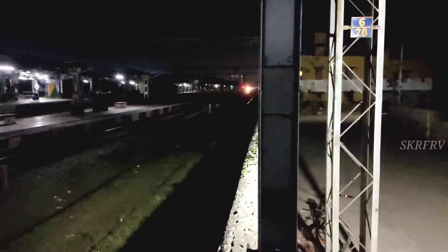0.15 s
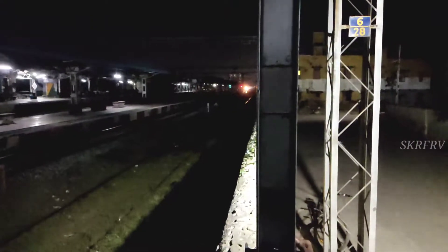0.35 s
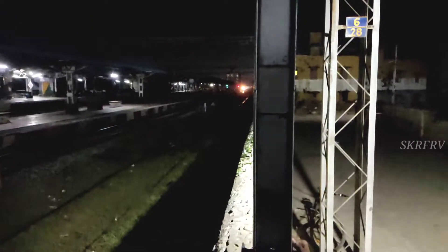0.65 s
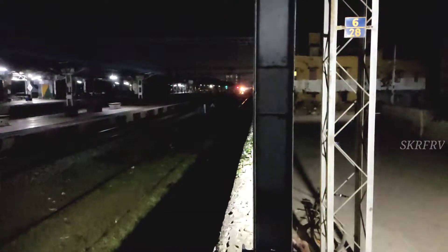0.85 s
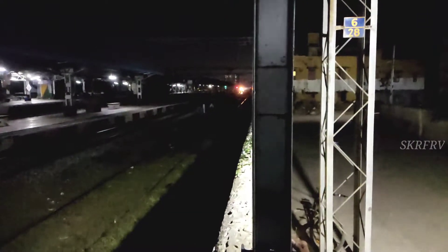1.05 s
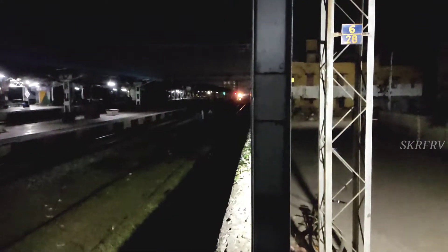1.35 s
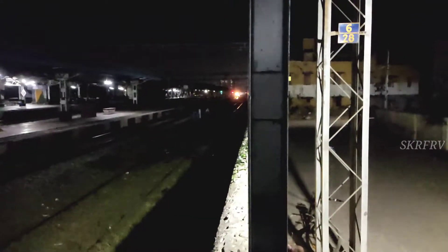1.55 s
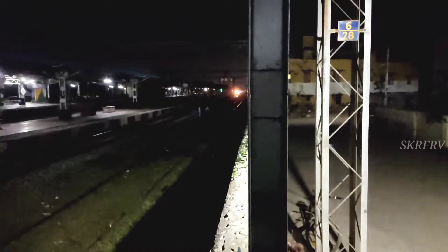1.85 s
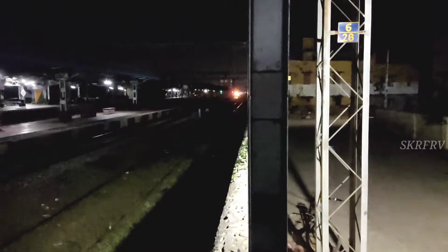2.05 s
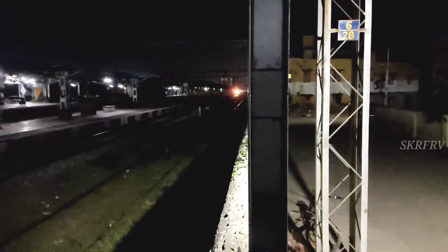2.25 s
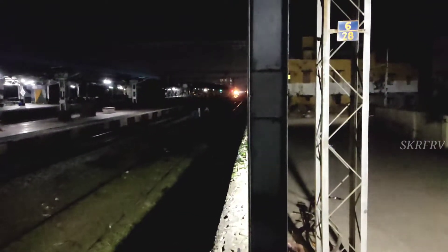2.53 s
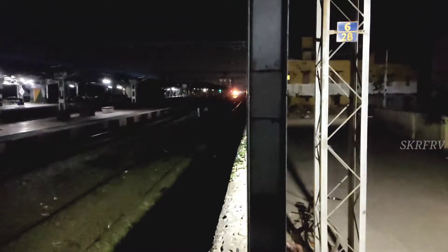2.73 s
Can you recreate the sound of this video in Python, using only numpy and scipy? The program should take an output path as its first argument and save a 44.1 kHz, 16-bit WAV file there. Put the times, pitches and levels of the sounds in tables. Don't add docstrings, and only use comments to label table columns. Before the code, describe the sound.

Loud wavering blower whine comes first and dominates, with rumbling wheels, faint singing gears and hissing air beneath; the train recedes and softens near the end, captured outdoors beside the tracks by a modest handheld recorder.

```python
import sys
import numpy as np
from scipy import signal
from scipy.fft import rfft, irfft, next_fast_len
from scipy.io import wavfile
from scipy.ndimage import uniform_filter1d, map_coordinates

SR = 44100
rng = np.random.default_rng(int(sys.argv[2]) if len(sys.argv) > 2 else 0)


def store_wav(level_fs):
    pcm = np.round(np.clip(np.atleast_2d(level_fs), -1, 1) * 32767)
    wavfile.write(sys.argv[1], SR, pcm.T.astype(np.int16))


def invert_db(level):
    return 10 ** (np.asarray(level, dtype=float) / 20)


N = 127449


def along(points, hz):
    point_hz, value = np.transpose(points)
    return np.interp(np.log(hz + 1), np.log(point_hz + 1), value)


def curve(rows):
    return np.interp(np.arange(N) / SR, *np.transpose(rows))


def unit(x):
    return x / np.sqrt(np.mean(np.abs(x) ** 2) + 1e-20)


def wobble(rate):
    return map_coordinates(rng.standard_normal(400), [np.arange(N) * rate / SR])


def swell(peak_s, length_s):
    return np.exp(-.5 * ((np.arange(N) / SR - peak_s) / length_s) ** 2)


def filtered(x, response):
    size = next_fast_len(N + 8192)
    spectrum = rfft(x, size) * response(np.fft.rfftfreq(size, 1 / SR))
    return irfft(spectrum, size)[..., :N]


def hump(hz, width_hz):
    return lambda f: 1 / (1 + ((f - hz) / width_hz) ** 2)


def shaped(points_db):
    return lambda f: invert_db(along(points_db, f))


def rush(response, patchy_db, alike=None):
    # hz, port_likeness (0-1)
    usual_alike = [(60, 1), (350, 0.91), (500, 0.26), (800, 0.55), (1900, 0.31), (4000, 0.19), (6500, 0.59),
                   (8500, 0.083)]
    likeness = usual_alike if alike is None else alike
    z = signal.stft(rng.standard_normal((2, N + 512)), nperseg=512)[2]
    patches = uniform_filter1d(rng.standard_normal(z.shape[1:]), size=5, axis=0)
    patches = uniform_filter1d(patches, size=14, axis=1)
    pair = signal.istft(z * invert_db(patchy_db * unit(patches)), nperseg=512)[1][:, :N]

    def shared_and_own(f):
        angle = np.arccos(np.clip(along(likeness, f), -1, 1)) / 2
        return response(f) * np.array([np.cos(angle), np.sin(angle)])

    same, other = filtered(pair, shared_and_own)
    return unit(np.array([same + other, same - other]))


def tone(hz, blur_hz, steady):
    path_rad = 0.23 + 0.38 * wobble(6.175)
    phase = 2 * np.pi * np.cumsum(hz) / SR + path_rad * np.array([[1], [-1]])
    re, im = unit(filtered(rng.standard_normal((2, 3, N)), hump(0, blur_hz)))
    paths = (re + 1j * im) / np.sqrt(2)
    port_spread = 0.56
    envelope = steady + paths[0] + port_spread * paths[1:]
    return unit(np.real(envelope * np.exp(1j * phase)))


def air(far_db):
    # hz, level_db_per_hz
    jet_spectrum = [(1800, -75), (2600, -61), (3800, -64), (4700, -60), (5300, -63), (7000, -66),
                    (8500, -91)]
    # hz, level_db_per_hz
    air_spectrum = [(700, -86), (1400, -57), (2200, -52.5), (3000, -59.5), (4700, -62), (5600, -61.5),
                    (7600, -51), (16000, -61)]
    facing = swell(peak_s=0.81, length_s=0.84)
    jet = invert_db(-39) * facing * rush(shaped(jet_spectrum), patchy_db=2.5, alike=[(1000, 1)])
    scattered_db = -28 + 0.93 * far_db + .45 * wobble(9)
    return jet + invert_db(scattered_db) * rush(shaped(air_spectrum), patchy_db=1.46)


def wheels(far_db):
    # hz, level_db_per_hz
    roll_spectrum = [(20, -52), (60, -59.5), (130, -58), (250, -45), (450, -42), (900, -50), (1300, -59),
                     (3000, -70)]
    # hz, width_hz, level_db
    resonances = [(71, 29.4, -39), (205.3, 47, -33.5), (225.4, 15, -36), (301, 22, -39), (556, 102, -38.5)]
    # peak_s, length_s, level_db
    joints = [
        (.1, 0.063, -29),
        (1.06, 0.024, -24.5),
        (2.08, 0.053, -35),
    ]
    surge_db = .8
    rolling = invert_db(-29.5) * rush(shaped(roll_spectrum), patchy_db=1.5)
    for hz, width_hz, level_db in resonances:
        gain = invert_db(level_db + surge_db * wobble(4.25))
        rolling = rolling + gain * rush(hump(hz, width_hz), patchy_db=1.06)
    puffs = sum(invert_db(level_db) * swell(peak_s, length_s) for peak_s, length_s, level_db in joints)
    rolling_gain = invert_db(0.77 * far_db + surge_db * wobble(7.1))
    return rolling_gain * rolling + puffs * rush(hump(574, width_hz=240), patchy_db=2)


def drive():
    # time_s, level_db
    mesh_level = [(0, -40.5), (.1, -33.5), (.33, -39), (.5, -29), (.57, -40), (.87, -30), (1.2, -41.5),
                  (1.5, -41.5), (2.89, -59)]
    # pitch_hz, peak_s, length_s, level_db
    motors = [
        (321, 1.42, .16, -34),
        (1184, .3, .2, -45),
        (1172, 1.73, .13, -44),
        (321, 2.12, .08, -40),
    ]
    out = invert_db(curve(mesh_level)) * tone(np.full(N, 3402), blur_hz=41.2, steady=0.62)
    side_db = -53.5 + 3.6 * wobble(1.8)
    out = out + invert_db(side_db) * tone(np.full(N, 3320), blur_hz=26, steady=0.2)
    for pitch_hz, peak_s, length_s, level_db in motors:
        motor = tone(np.full(N, pitch_hz), blur_hz=7, steady=2.5)
        out = out + invert_db(level_db) * swell(peak_s, length_s) * motor
    return out


def blowers(far_db):
    # time_s, blade_hz
    blade_pitch = [(0, 492.3), (1.0, 492.5), (1.35, 487.5), (2.2, 487.5), (2.5, 490), (2.89, 490)]
    # time_s, level_db
    hum_level = [(0, -46), (.25, -47), (.33, -30), (.57, -35.5), (.66, -19), (.9, -33.5), (1.0, -20.5),
                 (1.16, -37.5), (1.25, -31), (1.55, -24.5), (1.66, -25), (1.85, -24.5), (1.91, -31.5),
                 (1.98, -19.5), (2.12, -57), (2.42, -25), (2.72, -48), (2.89, -38.5)]
    # time_s, level_db
    whine_level = [(0, -7), (.15, -17.5), (.33, -7.5), (.55, -18), (.65, -7), (.87, -21), (1.02, -23.5),
                   (1.24, -10.5), (1.45, -21.5), (1.63, -12.5), (1.79, -7), (1.88, -34), (1.96, -31),
                   (2.07, -26.5), (2.38, -18), (2.7, -23.5), (2.79, -47), (2.89, -44)]
    # multiple, core_db, core_width_hz, fade_with_distance (dB per dB)
    overtones = [(2, -32, 9.3, 1.1), (3, -46, 19, 0.8), (4, -37.5, 18.5, 0), (5, -45.5, 40, 1),
                 (6, -43.5, 24, 0.7), (8, -55, 23, 1)]
    # centre_hz, width_hz, level_db, fade_with_distance (dB per dB)
    haze = [(482.4, 18, -31.5, 0.1), (986, 40.2, -24.5, 0.8), (1986, 97, -33.5, 0), (3560, 78, -50.5, 1.45),
            (2427, 110, -45, 1)]
    second_blade_hz, octave_cut_db = 485.5, 4
    blade_hz = curve(blade_pitch) + 2.624 * wobble(14)
    out = invert_db(curve(hum_level)) * tone(blade_hz, blur_hz=4.4, steady=3)
    whine_gain = invert_db(curve(whine_level) - octave_cut_db)
    out = out + whine_gain * tone(2 * blade_hz, blur_hz=7.7, steady=3)
    for multiple, core_db, width_hz, fade in overtones:
        gain = invert_db(core_db + fade * far_db + 2 * wobble(5.04))
        out = out + gain * tone(np.full(N, round(multiple) * second_blade_hz), width_hz, steady=.45)
    for centre_hz, width_hz, level_db, fade in haze:
        out = out + invert_db(level_db + fade * far_db) * rush(hump(centre_hz, width_hz), patchy_db=0.37)
    return out


def scene():
    # time_s, loudness_db of rumble and air
    departure = [(0, -1.5), (.15, 2.5), (.27, 1), (.55, 2), (.78, 0), (.92, 2), (1.05, 0.5), (1.45, 0),
                 (1.6, -2), (2.05, -0.5), (2.25, -3), (2.6, -5), (2.89, -4)]
    far_db = curve(departure)
    return blowers(far_db) + drive() + wheels(far_db) + air(far_db)


def gated(x):
    # hz, threshold_db re surroundings
    threshold = [(2400, -40), (2600, -6), (4300, -4.6), (5200, -4.6), (6000, -6), (9000, -6), (9500, -.6),
                 (14000, -1)]
    hz, _, z = signal.stft(np.array([x[0] + x[1], x[0] - x[1]]) / 2, SR, nperseg=1024)
    near = uniform_filter1d(np.abs(z) ** 2, size=4, axis=1)
    near = uniform_filter1d(near, size=3, axis=2)
    around = uniform_filter1d(np.log(near.mean(0) + 1e-20), size=30, axis=0)
    around = np.exp(uniform_filter1d(around, size=9, axis=1))
    keep = near > invert_db(2 * along(threshold, hz))[:, None] * around
    mid, side = signal.istft(z * keep, SR, nperseg=1024)[1][:, :N]
    return np.array([mid + side, mid - side])


def roll_off(x):
    return signal.sosfilt(signal.butter(12, 14170, fs=SR, output="sos"), x)


def record(dry):
    # hz, level_db
    port_colour = [(7000, 0.5), (8500, -4), (9300, -13.5), (9700, -21), (11000, -22), (13500, -46.5),
                   (14100, -54), (14300, -120)]
    # hz, left_over_right_db
    lean = [(350, 4), (480, 0.5), (1000, 4), (1900, 5.5), (2600, 1.5), (7300, -1.5), (8500, 4), (11000, 0)]
    # hz, left_over_right_db
    lean_late = [(1900, 1), (2500, -2.5), (4300, -5), (6500, -1.5), (8500, -3.5)]
    # hz, level_db_per_hz
    hiss_spectrum = [(300, -31.5), (9000, -3), (10500, -4), (14200, -1), (14500, -55)]
    sign, lag_s = np.array([[1], [-1]]), 0.000535

    def ports(shift):
        def response(f):
            lean_db = along(lean, f) + shift * along(lean_late, f)
            lag = np.exp(-1j * np.pi * f * lag_s * sign)
            return invert_db(along(port_colour, f) + sign * lean_db / 2) * lag
        return filtered(dry, response)

    gone = np.arange(N) / N
    hiss = invert_db(-64.5) * rush(shaped(hiss_spectrum), patchy_db=-2.0, alike=[(1000, 0.081)])
    mix = gated((1 - gone) * ports(-0.32) + gone * ports(1.48) + hiss)
    return roll_off(mix)


dry = scene()
out = record(dry)
store_wav(out)
```